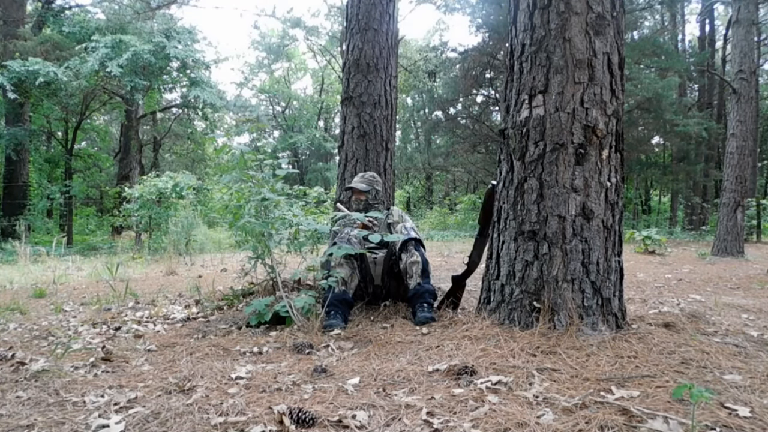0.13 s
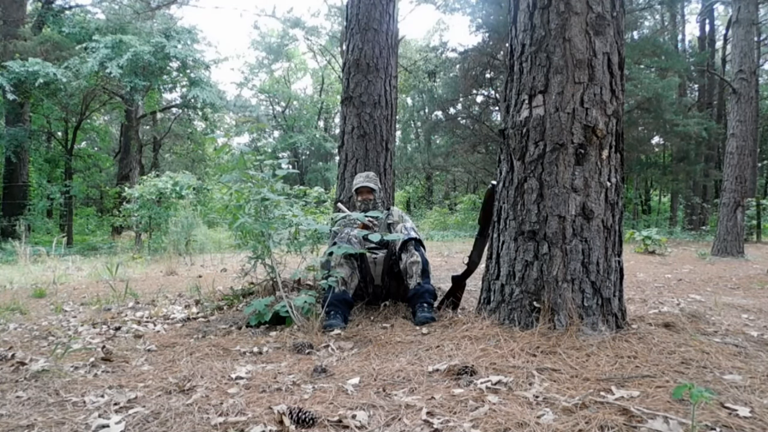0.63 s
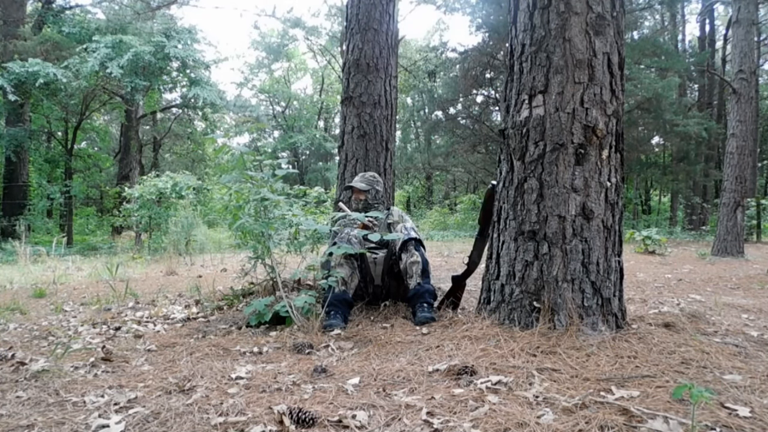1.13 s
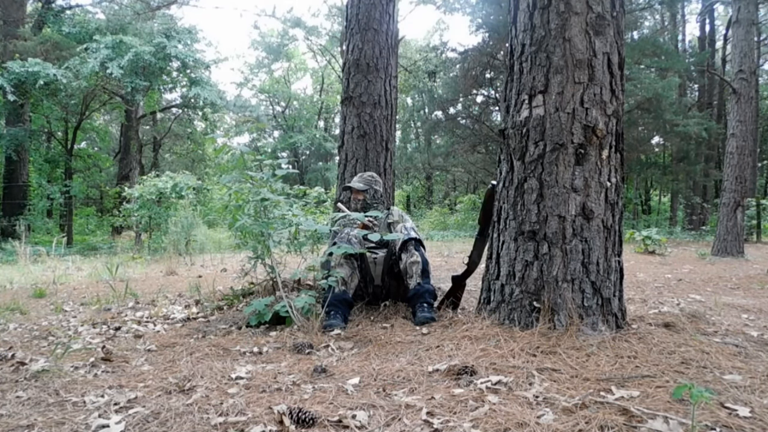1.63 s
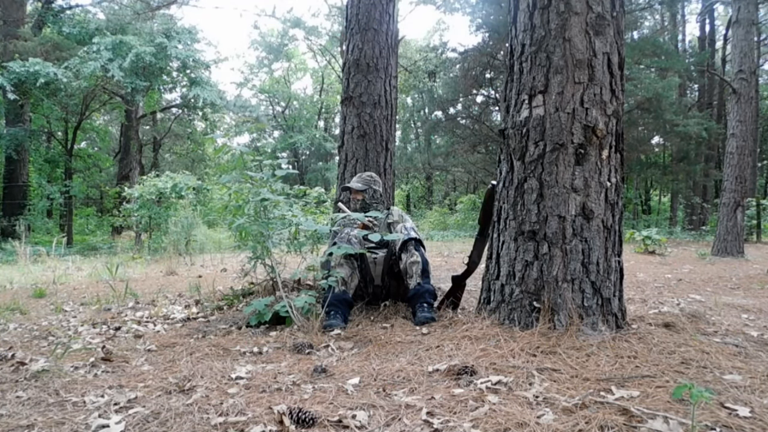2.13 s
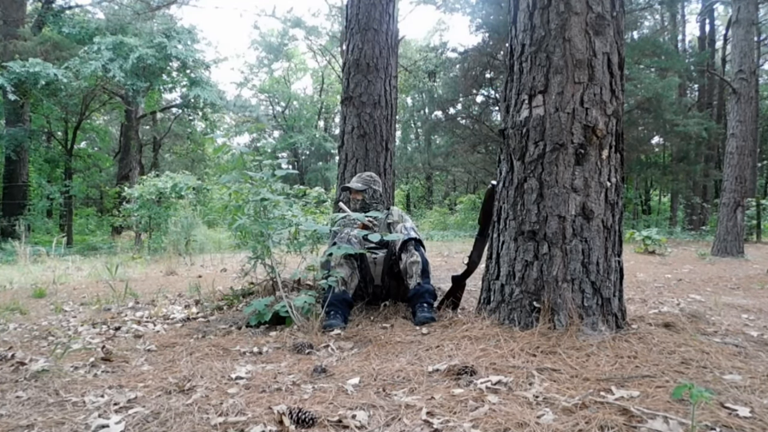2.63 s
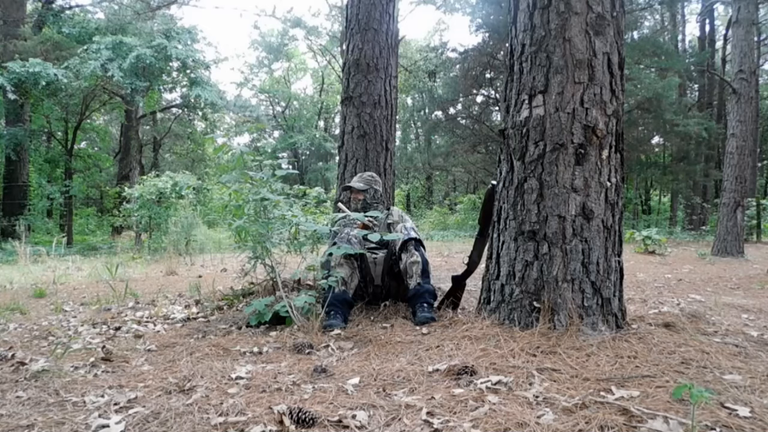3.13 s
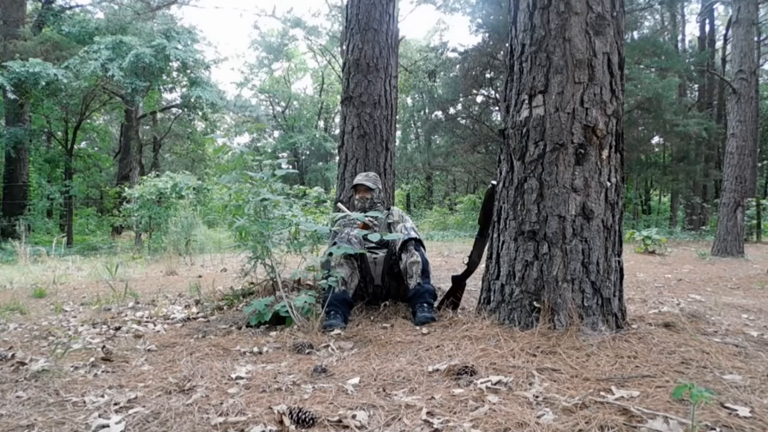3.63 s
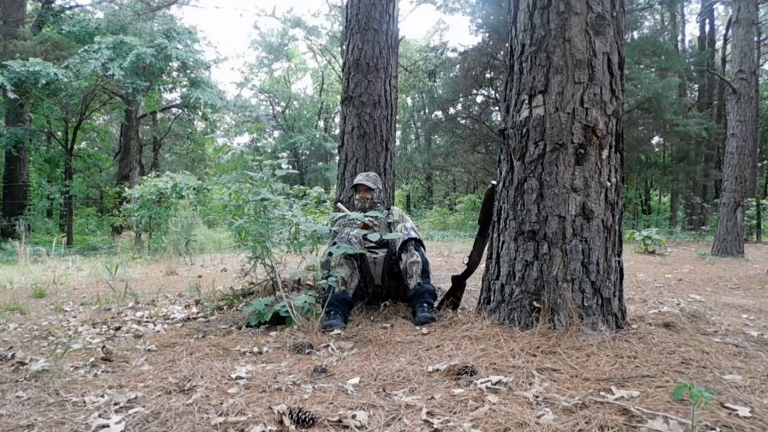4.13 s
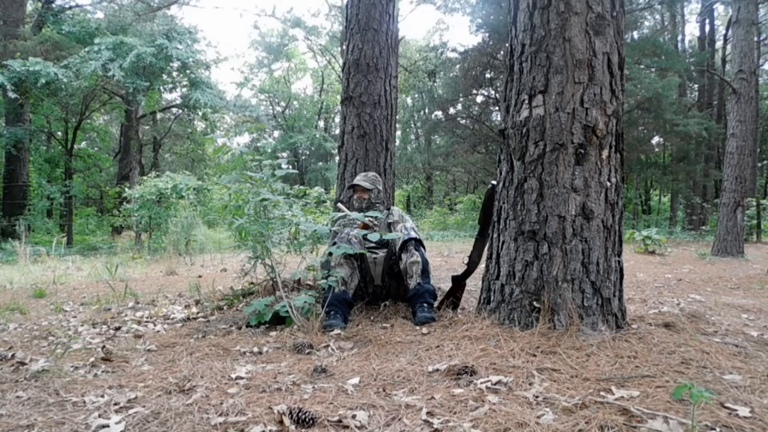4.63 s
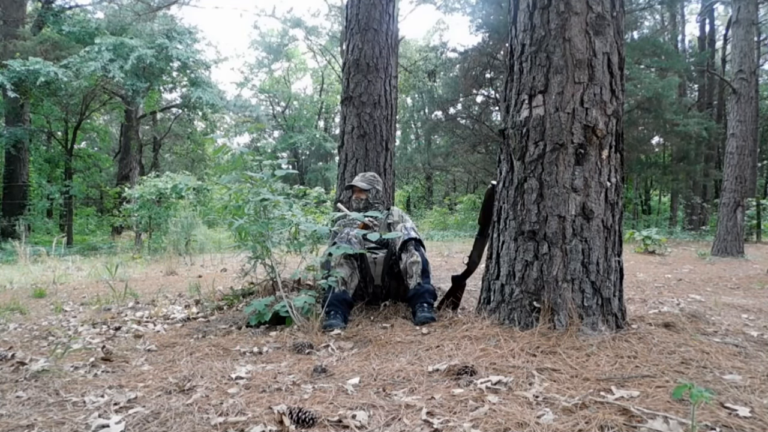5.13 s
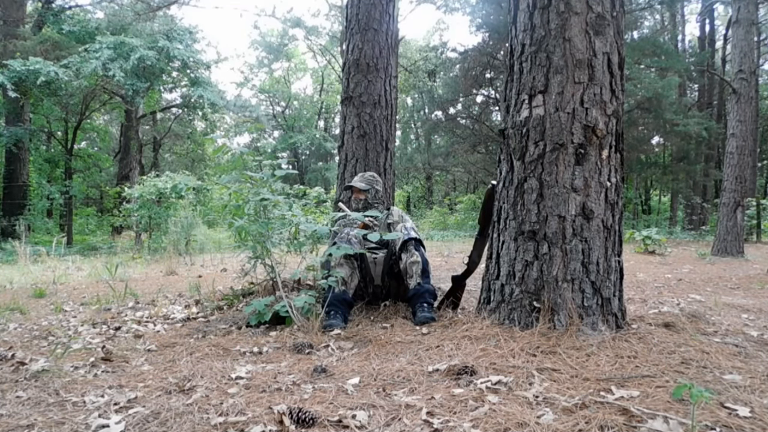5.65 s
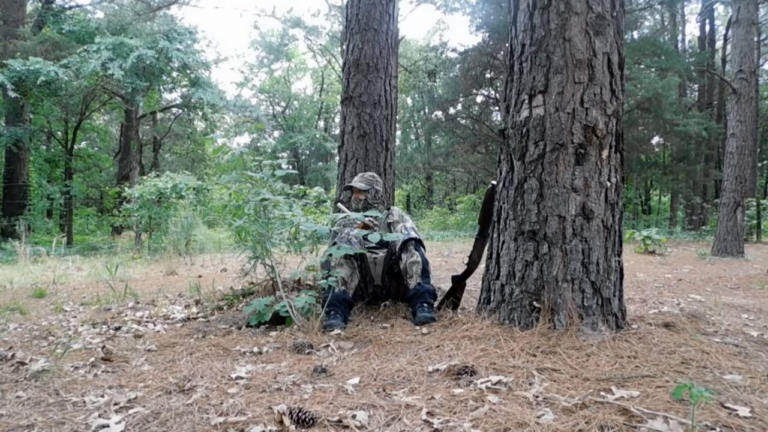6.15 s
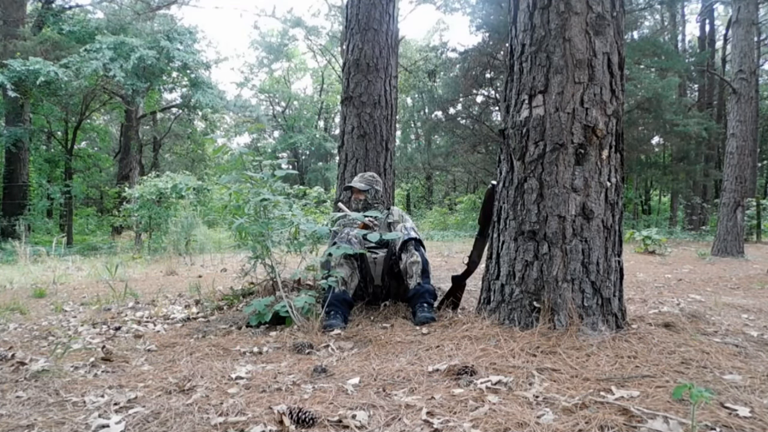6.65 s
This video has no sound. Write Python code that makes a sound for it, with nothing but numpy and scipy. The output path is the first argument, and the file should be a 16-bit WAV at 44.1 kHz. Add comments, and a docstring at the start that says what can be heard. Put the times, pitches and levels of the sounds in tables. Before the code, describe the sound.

Sharp reedy turkey-call clucks, spaced apart, then a quick run of seven raspy yelps echo through a quiet pine wood with faint birds.

```python
"""Open pine wood: distant rumble, leaf hiss and insect bands throughout, a far warbling bird from the start.
A small knock, then a latex-reed turkey call a few metres off: three single clucks, with faint chirps, a hoot
and a second knock between them and a rising whine before the third; then a run of seven yelps, a trunk's dull
echo after the first of them, a second hoot and a songbird near the end.
The reed whistles, and slaps every 2nd, 3rd or 4th swing when driven harder; the slaps ring the call and mouth.
Birds are gliding tones, the bed is filtered noise, and trunks echo call and birds to a small stereo microphone."""
import sys
import numpy as np
from scipy import signal
from scipy.fft import rfft, irfft
from scipy.io import wavfile

SR = 44100
rng = np.random.default_rng(int(sys.argv[2]) if len(sys.argv) > 2 else 0)


def linear_from_db(decibels):
    """Turn decibels (scalar or array-like) into linear amplitude factors; 0 gives 1."""
    return 10 ** (np.asarray(decibels, float) / 20)


def unload_wav(signal):
    """Save mono or channel-first audio to the path in sys.argv[1] as 16-bit WAV at rate SR, clipped to [-1, 1]."""
    wavfile.write(
        sys.argv[1],
        SR,
        np.round(np.clip(np.atleast_2d(signal).T, -1, 1) * 32767).astype(np.int16),
    )


N = 298557
T = np.arange(N) / SR  # time, s
F = np.arange(N // 2 + 1) * SR / N + 1e-6  # frequency, Hz; kept off zero for the logarithm

# spectrum of rumble and leaf hiss: frequency_hz, relative_density_db (per Hz)
WOOD_SPECTRUM = [(15, -37), (25, -7), (96, -13), (157, -7.5), (276, -7), (769, -0.5), (1550, -6.5),
                 (3880, -21.5), (4440, -20.5), (4940, -26), (7820, -29.5), (8710, -31.5), (15800, -35)]
# stereo spread of the noise beds: frequency_hz, side_minus_mid_db
STEREO_SPREAD = [(60, -38.5), (110, -25.5), (200, -16.5), (380, -9.5), (700, -11), (1290, -5.5),
                 (2380, -0.5), (4400, 1), (8120, 0.5), (15000, 1.5)]
# narrow insect bands and a rumble: centre_hz, width_hz (of each of two passes), level_db
INSECT_AND_RUMBLE_BANDS = [(4500, 360, -73), (8690, 240, -79), (33.1, 10, -87)]
# a wavering drone: time_s, level_db
DRONE_LEVEL = [(0, -69), (1.1, -64), (2.4, -58), (2.88, -53), (3.05, -60), (3.24, -97), (3.43, -58),
               (3.69, -74), (4.05, -59), (4.49, -65), (4.79, -52.5), (5.02, -63), (5.35, -57),
               (6.41, -62.5), (6.77, -75)]
# a low hum: time_s, level_db
HUM_LEVEL = [(0, -73), (1.07, -85), (2.3, -73), (2.85, -72), (3.24, -73), (4.05, -69.5), (4.8, -71.5),
             (5.05, -74), (6.77, -75)]
# notes of the far warbling bird: start_s, length_s, from_hz, to_hz, level_db (mid-note)
WARBLE_NOTES = [(.03, .15, 2774, 2820, -67), (.19, 0.26, 2630, 2650, -77), (1.8, .16, 2754, 2580, -68),
                (2.04, .24, 2823, 2690, -66.5), (2.28, .3, 2760, 2620, -63.5),
                (2.8, 0.12, 2580, 2760, -62.5), (2.97, 0.15, 2630, 2650, -66),
                (4.06, 0.074, 2790, 2790, -70), (4.4, 0.079, 2560, 2460, -69),
                (4.53, 0.23, 2740, 2830, -65.5)]
# short dull bursts, two knocks and a trunk's echo after the first yelp:
# start_s, level_db, centre_hz, width_hz (of each of four passes), length_s (start to loudest)
DULL_BURSTS = [(.766, -35, 1400, 1300, .004), (1.721, -40, 1400, 1400, .004), (4.788, -37, 1550, 700, .005)]
# turkey call, one list a call, clucks first: time_s, pitch_hz (under the onset drop), level_db (whistle)
CALLS = [
    [(1.167, 1560, -38), (1.178, 1416, -20.5), (1.187, 1391, -20), (1.199, 1520, -22), (1.204, 1570, -20),
     (1.212, 1620, -21)],
    [(2.598, 1330, -16.5), (2.613, 1325, -19.5), (2.622, 1395, -21.5), (2.631, 1504, -21.5)],
    [(4.321, 1234, -23), (4.331, 1158, -25.5), (4.337, 1254, -33.5), (4.347, 1528, -22), (4.359, 1726, -26)],
    [(4.646, 1580, -38.5), (4.661, 1553, -34), (4.674, 1384, -28), (4.698, 1357, -29), (4.723, 1399, -22.5),
     (4.737, 1460, -30), (4.748, 1590, -25)],
    [(4.968, 1580, -50.5), (4.986, 1462, -30), (4.996, 1470, -31), (5.016, 1340, -27), (5.045, 1302, -24),
     (5.065, 1327, -24), (5.081, 1423, -23.5), (5.101, 1650, -21.5)],
    [(5.293, 1358, -30), (5.317, 1369, -24.5), (5.336, 1401, -21), (5.356, 1361, -21.5),
     (5.394, 1373, -23.5), (5.411, 1626, -22.5)],
    [(5.611, 1252, -31), (5.621, 1227, -23.5), (5.63, 1344, -24), (5.646, 1373, -19.5),
     (5.661, 1299, -26.5), (5.676, 1270, -27), (5.692, 1404, -23.5), (5.705, 1614, -20)],
    [(5.946, 1320, -25), (5.958, 1305, -24), (5.975, 1345, -22), (5.999, 1266, -27), (6.015, 1308, -25.5),
     (6.03, 1676, -17.5)],
    [(6.246, 1379, -21.5), (6.256, 1336, -27), (6.28, 1377, -20.5), (6.309, 1290, -24), (6.324, 1354, -24),
     (6.338, 1646, -19.5)],
    [(6.541, 1275, -24), (6.563, 1362, -26), (6.578, 1383, -17), (6.593, 1337, -25), (6.608, 1335, -20.5),
     (6.623, 1422, -24.5), (6.639, 1607, -18.5)],
]
# base treble lift of the slaps, one value a call: lift_db
CALL_LIFT_DB = [-18, -11, -12, -25, -15, -18, -11.5, -12, -12.5, -10]
# call and mouth resonances: centre_hz, width_hz, gain_db
CALL_BODY = [(1307, 327, -0.5), (1757, 132, 5), (2038.5, 101, -7), (2555, 135, -5.5), (3280, 170, -24),
             (4300, 126, -15), (5120, 172, -26), (6170, 510, -31.5), (7100, 90, -31.5), (9300, 3800, -52.5)]
# slap lines at odd halves of the pitch: over_whistle_db, knee_hz (fades above), fade_db_per_hz
HALF_PITCH_LINES = (1.74, 1407, 0.048)
# slap lines at whole multiples of the pitch: over_whistle_db, knee_hz (fades above), fade_db_per_hz
WHOLE_PITCH_LINES = (4.5, 1323, 0.15)
# spells of slapping every 4th swing: start_s, length_s, level_db (a line, ahead of the body)
FOURTH_SPELLS = [(2.61, 0.032, -25.5), (5.044, 0.012, -31), (5.061, 0.04, -30.5), (5.36, .021, -31.5),
                 (5.381, 0.03, -26.5), (5.688, 0.02, -29.5), (5.964, 0.031, -28.5), (6.272, 0.027, -28),
                 (6.313, 0.027, -24), (6.57, 0.071, -25)]
# spells of slapping every 3rd swing, strong and weak by turns: start_s, length_s, level_db (as above)
THIRD_SPELLS = [(5.652, 0.038, -23.5), (5.98, .045, -23.5), (6.3, 0.013, -23)]
# balance of the call at the two ports: frequency_hz, left_minus_right_db
PORT_BALANCE = [(1300, .5), (2400, -1.5), (8000, -1)]
# faint falling chirps: start_s, length_s, from_hz, to_hz, level_db (mid-note)
CHIRP_NOTES = [(1.45, .04, 3500, 2900, -71), (1.553, 0.013, 7900, 5200, -61),
               (1.625, 0.027, 3730, 3130, -67), (1.775, .055, 4300, 3200, -70),
               (1.99, 0.025, 3600, 3130, -68), (3.088, 0.019, 7800, 5900, -77),
               (3.652, .016, 7300, 6050, -73), (6.39, 0.089, 6200, 5680, -58.5)]
# short low hoots: start_s, length_s, from_hz, to_hz, level_db (mid-note, before the harmonic gains)
HOOT_NOTES = [(1.505, 0.0425, 319.8, 287.4, -52), (5.25, 0.054, 308, 283, -55)]
# first five harmonics of a hoot, in order: gain_db
HOOT_HARMONICS_DB = [-12, -0.5, -1.5, -5.5, -7.5]
# a far rising whine: time_s, pitch_hz, level_db
WHINE_GLIDE = [(3.2, 1200, -77), (3.4, 1450, -71), (3.58, 1660, -65), (3.7, 1720, -70), (3.95, 1850, -78)]
# songbird, one list a note: time_s, pitch_hz, level_db
SONG_NOTES = [
    [(6.145, 4700, -78), (6.17, 5330, -65), (6.21, 3500, -66)],
    [(6.25, 2900, -58), (6.3, 3900, -49), (6.35, 4500, -49.5), (6.4, 4720, -46), (6.445, 4160, -51.5),
     (6.48, 3270, -62)],
    [(6.55, 3225, -53), (6.6, 4400, -52), (6.635, 5370, -50), (6.655, 5440, -39), (6.665, 4310, -48),
     (6.673, 3410, -62)],
    [(6.69, 5580, -66), (6.712, 5300, -42.5), (6.722, 4500, -48), (6.73, 3120, -71)],
]


def on_log(table):
    """Gain at every frequency, drawn through (Hz, dB) points on a log axis."""
    hz, db = np.transpose(table)
    return linear_from_db(np.interp(np.log(F), np.log(hz), db))


def peak(hz, width):
    """Response of one resonance, gain 1 at its centre."""
    return 1 / (1 + 1j * (F / hz - hz / F) * hz / width)


def shape(x, response):
    """Filter by a frequency response."""
    return irfft(rfft(x) * response, N)


def unit(x):
    """Scale to rms 1."""
    return x / np.sqrt(np.mean(x ** 2))


def walk(rate_hz):
    """Random drift of rms 1: noise that falls off above rate_hz."""
    return unit(shape(rng.standard_normal(N), 1 / (1 + (F / rate_hz) ** 2)))


def hiss(response):
    """Stereo noise of rms 1, nearly alike left and right in the bass."""
    mid, side = rfft(rng.standard_normal((2, N))) * response
    side = irfft(side * on_log(STEREO_SPREAD), N)
    return unit(irfft(mid, N) + side * np.array([[1], [-1]]))


def woodland():
    """Rumble and leaf hiss that swell a little, with narrow noise bands for insects, rumble, drone and hum."""
    out = linear_from_db(-54.5 + 0.5 * walk(5.0)) * hiss(on_log(WOOD_SPECTRUM))
    out += linear_from_db(np.interp(T, *np.transpose(DRONE_LEVEL))) * hiss(peak(778.2, 34) ** 2)
    out += linear_from_db(np.interp(T, *np.transpose(HUM_LEVEL))) * hiss(peak(172.3, 9.6) ** 2)
    for hz, width, db in INSECT_AND_RUMBLE_BANDS:
        out += linear_from_db(db + 1.8 * walk(8.7)) * hiss(peak(hz, width) ** 2)
    return out


def notes(rows):
    """Straight glides, loudest in the middle, as (s, Hz, dB) tables."""
    edge_db = -3  # start and end against the middle
    tables = []
    for s, length, first_hz, last_hz, db in rows:
        middle = (s + length / 2, (first_hz + last_hz) / 2, db)
        tables.append([(s, first_hz, db + edge_db), middle, (s + length, last_hz, db + edge_db)])
    return tables


def whistles(tables, harmonics_db, flutter_rad=0):
    """Gliding notes: summed harmonics with soft ends; flutter shakes the phase and so the pitch."""
    out = np.zeros(N)
    shake = flutter_rad * walk(36.0)
    for table in tables:
        s, hz, db = np.transpose(table)
        at = np.flatnonzero((T >= s[0]) & (T <= s[-1]))
        phase = 2 * np.pi * np.cumsum(np.interp(T[at], s, hz)) / SR + shake[at]
        tone = sum(linear_from_db(gain_db) * np.sin(k * phase) for k, gain_db in enumerate(harmonics_db, 1))
        gain = np.sqrt(2) * np.interp(T[at], s, linear_from_db(db))  # sine peak from rms
        out[at] += gain * signal.windows.tukey(len(at), 0.2) * tone
    return out


def warbler():
    """The far bird: pure tones with a strong random flutter of phase."""
    return whistles(notes(WARBLE_NOTES), [0], flutter_rad=2.2)


def trunks(x, rise_s, near_db, near_t60, far_db, far_t60, dull_hz, patchy_db):
    """Scattered echoes as decaying noise: a lumpy tail from near trunks, a long dull one from the deep wood."""
    rise = np.clip(T / rise_s, 0, 1) ** 2
    noise = rng.standard_normal((2, 2, N)) * linear_from_db(patchy_db * walk(100.0)) * rise
    near = linear_from_db(near_db - 60 * T / near_t60) * noise[0]
    far = shape(linear_from_db(far_db - 60 * T / far_t60) * noise[1], 1 / (1 + 1j * F / dull_hz))
    echo = near + far
    echo = echo + 0.32 * echo.sum(axis=0)  # both ports hear much the same trunks
    return signal.fftconvolve(echo[:, :2 * SR], x[None], axes=1)[:, :N]


def dull_bursts():
    """Knocks, and a trunk's echo after the first yelp: short noise bursts, each through one dull resonance."""
    out = np.zeros(N)
    for s, db, hz, width, length in DULL_BURSTS:
        burst = np.exp(-3 * (T - s - length) ** 2 / length ** 2) * rng.standard_normal(N)
        makeup = np.sqrt(SR / width / 2)  # a narrow filter passes less noise
        out += linear_from_db(db) * makeup * shape(burst, peak(hz, width) ** 4)
    return out


def spells(rows):
    """Share 0-1 and gain of a slap pattern that comes and goes."""
    edge = 0.26  # share of a spell spent fading in and out
    share, gain = np.zeros((2, N))
    for s, length, db in rows:
        away = np.abs(2 * (T - s) / length - 1)  # 0 mid-spell, 1 at its ends
        on = np.clip((1 - away) / edge, 0, 1)
        share = np.maximum(share, on)
        gain = gain + np.sqrt(2) * linear_from_db(db) * on ** 2
    return share, gain


def slap_lines(tone, whistle_db, hz, lines):
    """A slack (low) reed slaps: line gain fades above a knee pitch and grows faster than the whistle."""
    over_db, knee_hz, fade = lines
    effort_db = 0.23 * (whistle_db + 25)  # extra dB for each dB of whistle over -25
    return tone * linear_from_db(over_db + effort_db - fade * np.maximum(hz - knee_hz, 0))


def turkey_call():
    """A clean reed whistle, plus slap trains at fractions of its pitch that ring the call and mouth."""
    attack_s, release_s = 0.004, 0.0045
    onset_hz, onset_s = 453.5, 0.002815  # each call starts sharp and drops onto its pitch
    harden_db, spell_lift_db = 10.5, 3.5  # treble lift gained through a call, and during spells
    slack_hz, slack_lift = 1320, 0.1  # under this pitch the slaps sharpen, dB per Hz
    whistle, slaps, sharp, puff, pops = np.zeros((5, N))
    wobble = 0.06 * walk(320.0)  # rad of whistle phase
    air = rng.standard_normal(N)
    uneven, patchy = (linear_from_db(1.3 * walk(60.0)) for _ in range(2))  # slap strength wavers, dB
    in_fourth, fourths = spells(FOURTH_SPELLS)
    in_third, thirds = spells(THIRD_SPELLS)

    for table, base_lift_db in zip(CALLS, CALL_LIFT_DB):
        s, hz, db = np.transpose(table)
        length = s[-1] + release_s - s[0]
        at = np.flatnonzero((T >= s[0]) & (T <= s[-1] + release_s))
        age = T[at] - s[0]
        hz = np.interp(T[at], s, hz) + onset_hz * np.exp(-age / onset_s)
        db = np.interp(T[at], s, db)
        phase = 2 * np.pi * np.cumsum(hz) / SR
        fade = np.clip(np.minimum(age / attack_s, (length - age) / release_s), 0, 1)
        tone = np.sqrt(2) * linear_from_db(db) * fade
        # a call under 0.06 s is a cluck: octave-under tone against the whistle, and gain of the hiss
        under_db, hiss_db = (-27, -40) if length < 0.06 else (-37, -45)
        whistle[at] += tone * (np.sin(phase) + linear_from_db(under_db) * np.sin(phase / 2))

        whole = slap_lines(tone * uneven[at], db, hz, WHOLE_PITCH_LINES)
        second = slap_lines(tone * uneven[at], db, hz, HALF_PITCH_LINES)
        fourth = (fourths * patchy)[at]
        third = thirds[at]
        late = phase + wobble[at]  # no slap lands exactly on time
        # twelfths of the pitch hold the lines of all three patterns; 12 is the whistle itself
        for m in range(8, 121):
            if m == 12 or (m % 2 and m % 3):
                continue
            if m % 12 == 0:
                gain = whole
            elif m % 6 == 0:
                gain = second
            elif m % 3 == 0:
                gain = fourth
            else:  # every 3rd swing; its strong-weak turn adds weaker lines halfway between
                gain = third * linear_from_db(-7 if m % 4 == 2 else 0)
            slaps[at] += gain * np.cos(m * late / 12 - 0.06 * m ** 2)  # a slap rolls along the reed

        # air rasps through the gap once a slap, most when the pattern breaks up
        gap = (1.36 + np.cos(phase / 2)) ** 1.46
        rasp = (fourth + third + (whole + second) / 2) * air[at] * gap
        lift_db = base_lift_db + harden_db * age / length
        lift_db = lift_db + slack_lift * np.maximum(slack_hz - hz, 0)
        lift = linear_from_db(lift_db + spell_lift_db * np.maximum(in_fourth, in_third)[at])
        sharp[at] += lift * (slaps[at] + linear_from_db(2) * rasp)
        leak = linear_from_db(-4) * tone * air[at]  # steady air past the reed
        puff[at] += linear_from_db(hiss_db) * (np.sqrt(lift) * rasp + leak)
        end = at[-260:]
        pops[end] += tone.max() * np.hanning(260) * air[end]  # the reed lets go

    body = sum((-1) ** k * linear_from_db(db) * peak(hz, width) for k, (hz, width, db) in enumerate(CALL_BODY))
    low = 1 / (1 + (F / 3300) ** 6)  # the treble lift works above this crossover
    bass_cut = 1 / (1 + (1050 / F) ** 6)
    out = whistle + shape(slaps, body * low * bass_cut) + shape(sharp, body * (1 - low))
    out += shape(puff, peak(8000, 3500))
    return out + linear_from_db(-8) * shape(pops, peak(1100, 450) ** 2)


def at_ports(call):
    """The call at two ports: a level balance by frequency, the right port leading by 0.26 rad."""
    tilt = np.sqrt(on_log(PORT_BALANCE)) * np.exp(-0.13j)  # half the difference on each side
    return np.array([shape(call, tilt), shape(call, 1 / tilt)])


def chirps():
    """Faint falling glides with a weak second harmonic."""
    return whistles(notes(CHIRP_NOTES), [0, -31])


def hoots():
    """Short low falling notes of five harmonics with a slight flutter of phase."""
    return whistles(notes(HOOT_NOTES), HOOT_HARMONICS_DB, flutter_rad=0.35)


def whine():
    """One slow rising glide with a weak second harmonic."""
    return whistles([WHINE_GLIDE], [0, -31])


def songbird():
    """Quick swooping notes with a weak second harmonic."""
    return whistles(SONG_NOTES, [0, -31])


def scene():
    """Wood, dull bursts, call and birds in stereo, the call and each group of birds with its own trunk echoes."""
    far_bird = warbler()
    call = turkey_call()
    birds = chirps() + hoots() + whine() + songbird()
    out = woodland() + dull_bursts()
    out += linear_from_db(4.5) * np.array([far_bird, np.roll(far_bird, -5)])  # right leads by 5 samples
    out += trunks(far_bird, rise_s=0.0022, near_db=-29.0, near_t60=0.1, far_db=-34, far_t60=0.7,
                  dull_hz=6000, patchy_db=3.0)
    out += at_ports(call)
    out += trunks(call, rise_s=0.0024, near_db=-49, near_t60=0.47, far_db=-58.5, far_t60=1.0,
                  dull_hz=4100, patchy_db=1.5)
    out += np.array([np.roll(birds, -3), linear_from_db(3.5) * birds])  # left leads by 3 samples, right is louder
    out += trunks(birds, rise_s=0.0055, near_db=-42, near_t60=0.36, far_db=-36.5, far_t60=0.6,
                  dull_hz=6000, patchy_db=3.4)
    return out


def band_limit(x):
    """A steep low-pass at the top of the band."""
    return signal.sosfilt(signal.butter(12, 15920, fs=SR, output="sos"), x)


def record(dry):
    """The finished mix as the camera stores it."""
    return band_limit(dry)


dry = scene()
out = record(dry)
unload_wav(out)
```